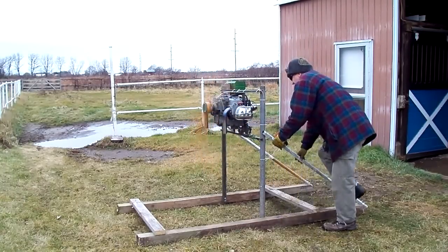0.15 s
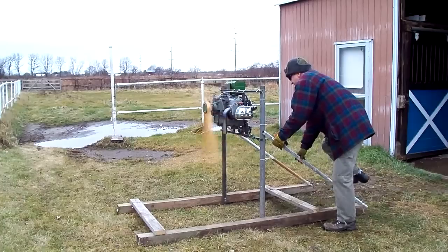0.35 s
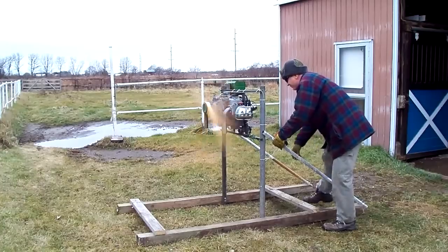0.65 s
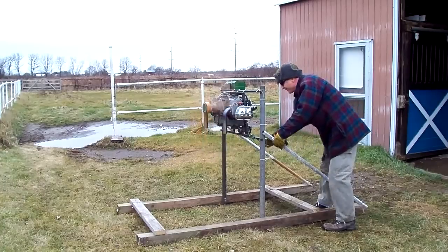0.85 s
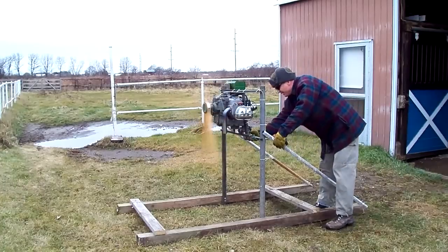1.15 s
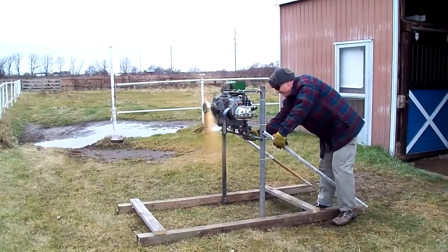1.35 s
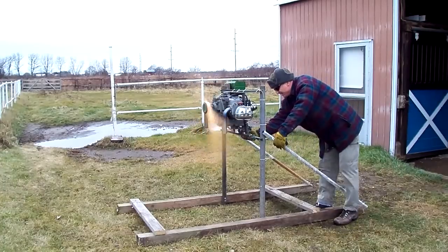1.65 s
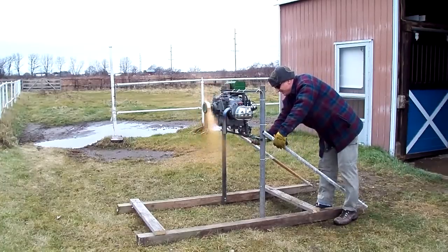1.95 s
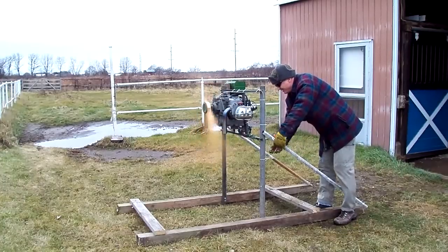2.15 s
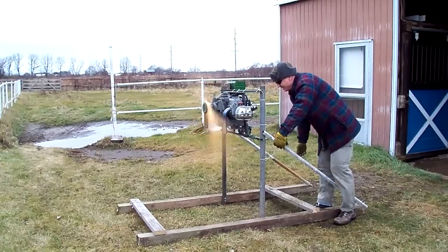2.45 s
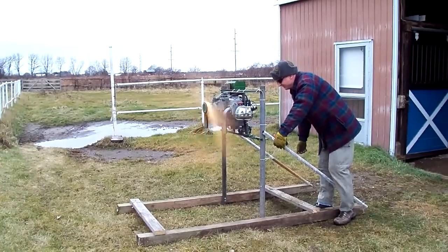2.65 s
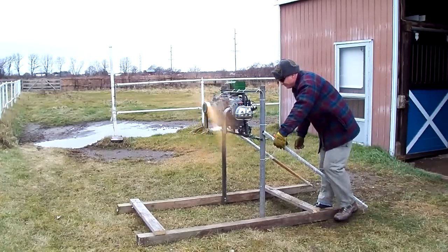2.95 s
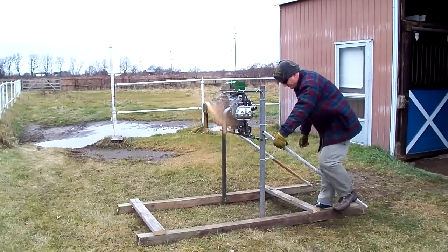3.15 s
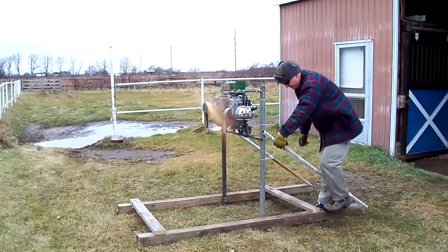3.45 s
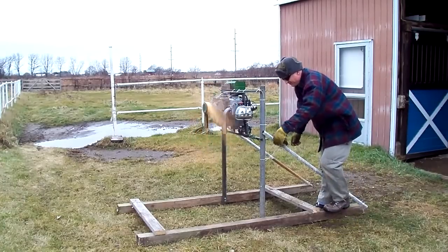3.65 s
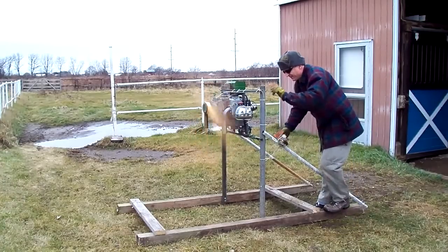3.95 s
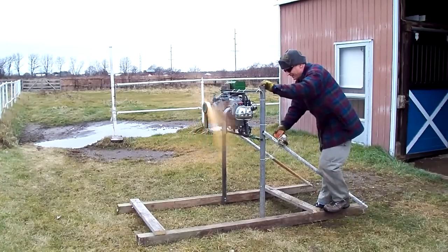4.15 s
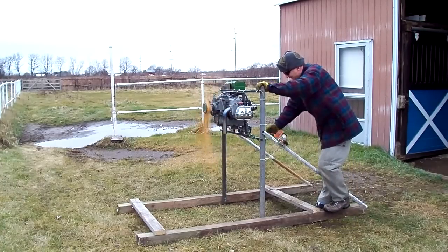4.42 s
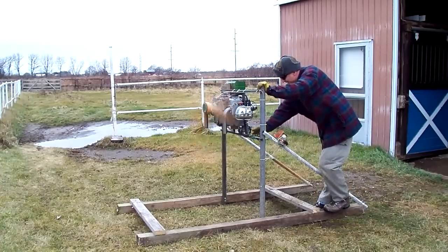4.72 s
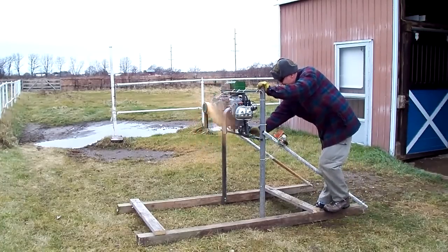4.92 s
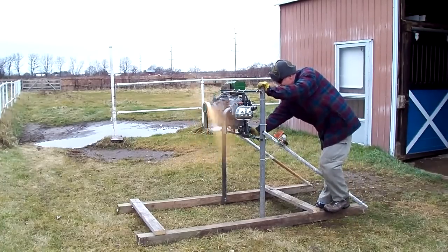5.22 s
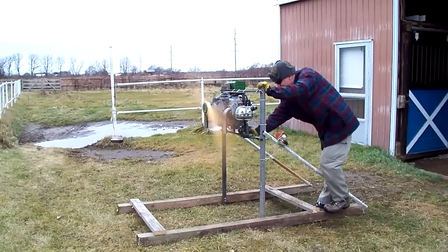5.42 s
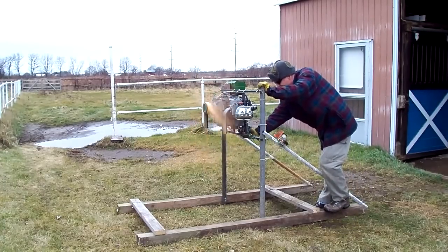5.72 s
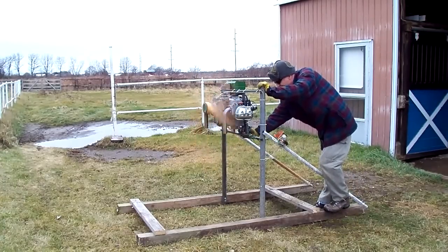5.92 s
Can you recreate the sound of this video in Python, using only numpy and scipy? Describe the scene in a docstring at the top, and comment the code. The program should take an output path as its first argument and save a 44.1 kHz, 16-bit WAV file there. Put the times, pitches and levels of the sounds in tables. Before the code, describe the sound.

Rapid, even exhaust putter from a two-cylinder engine turning a propeller in a yard, with rushing air and some wind buffeting.

```python
"""A small two-cylinder air-cooled engine idles on a stand in a yard and swings a wooden propeller. The
cylinders fire in turn through short pipes: each firing is a thump that rings in the pipe, with a spit of hot
gas and a tiny whistle. A barn wall echoes the firings, the stand rings and valves rattle. The propeller churns
the air and throbs, brief hums come and go, and wind buffets the microphone."""
import sys
import numpy as np
from scipy import signal
from scipy.fft import rfft, irfft, next_fast_len
from scipy.io import wavfile
from scipy.ndimage import map_coordinates

SR = 44100
rng = np.random.default_rng(int(sys.argv[2]) if len(sys.argv) > 2 else 0)


def wrap_up_sound(samples):
    """Save the sound to the file named by the first command line argument, as 16-bit audio."""
    columns = np.atleast_2d(samples).T
    # keep every value between -1 and 1, then stretch to whole-number steps
    tamed = np.clip(columns, -1, 1)
    steps = np.round(tamed * 32767).astype(np.int16)
    wavfile.write(sys.argv[1], SR, steps)


N = 268128

# How fast the engine turns: time_s, speed_rpm
ENGINE_SPEED = [(0, 1475.7), (0.55, 1449.1), (0.8, 1476.0), (1.0, 1450.1), (1.3, 1485.2), (1.6, 1483.0),
                (1.9, 1511.9), (2.8, 1477.1), (3.0, 1509.5), (3.15, 1479.0), (3.5, 1506.9), (4.1, 1500.3),
                (4.3, 1530.2), (4.45, 1512.4), (4.7, 1530.3), (5.5, 1499.9), (5.75, 1481.3), (6.08, 1498.5)]
# Slow changes in the strength of the firings: time_s, thump_change_db, spit_change_db
FIRING_STRENGTH = [(0, -0.5, 0.8), (.9, 0, 0.2), (1.4, -0.3, 0), (1.8, 0.5, -2), (2.5, -0.1, 0.6),
                   (3.05, .5, 1), (3.5, -.6, -1), (4.1, 0, 0), (4.7, 0.5, -0.5), (5.2, 0.8, 0.4),
                   (6.08, -1.4, 1)]
USUAL_SPIT_DB = -27.4


def amp(db):
    """Turn decibels into a number to multiply by."""
    return 10 ** (np.asarray(db) / 20)


def value_at(points, hz):
    """Read between rows of (frequency, value), giving each octave about equal room."""
    point_hz, values = np.transpose(points)
    return np.interp(np.log(hz + 1), np.log(point_hz + 1), values)


def filtered(sound, gain_at):
    """Multiply each frequency of a sound by gain_at(hz)."""
    size = next_fast_len(N + 8192)
    return irfft(rfft(sound, size) * gain_at(np.fft.rfftfreq(size, 1 / SR)), size)[:N]


def noise(colour):
    """Noise of typical size 1, shaped by rows of (frequency_hz, relative_db)."""
    shaped = filtered(rng.standard_normal(N), lambda hz: amp(value_at(colour, hz)))
    return shaped / np.std(shaped)


def wobble(per_s):
    """A smooth curve through per_s random values a second."""
    return map_coordinates(rng.standard_normal(int(N * per_s / SR) + 4), [np.arange(N) * per_s / SR])


def swell(t, swell_s):
    """Rise softly to 1 at twice swell_s, then fade."""
    age = t / swell_s
    return (age / 2) ** 2 * np.exp(2 - age)


def blip(t, swell_s, hz):
    """A short tone that swells and fades."""
    return swell(t, swell_s) * np.sin(2 * np.pi * hz * t)


def add(track, start_s, sound):
    """Mix a sound into a track at start_s."""
    part = track[max(round(start_s * SR), 0):][:len(sound)]
    part += sound[:len(part)]


def firings():
    """Each cylinder fires once in two turns, and no two charges of fuel are quite alike."""
    # Firings that whistle harder than most: time_s, spit_db, whistle_hz, whistle_db
    hard_firings = [(.221, -24.5, 7020, -26), (.386, -24, 4500, -31), (1.126, -24.5, 5000, -34),
                    (1.570, -26.5, 4900, -29), (1.932, -24, 6300, -31), (2.290, -25.5, 6250, -25),
                    (2.653, -26, 6240, -24), (3.257, -24.6, 5560, -35), (3.337, -27, 3420, -25),
                    (3.576, -26.5, 4600, -25), (3.698, -29, 5000, -26.5), (4.256, -28.5, 5100, -24),
                    (4.572, -25.2, 3050, -27), (4.651, -24.5, 5000, -34), (4.729, -25.5, 6870, -21),
                    (5.123, -27.5, 6370, -20), (5.682, -25, 6350, -23.5), (5.925, -24.9, 6890, -27)]
    first_peak_s, second_cylinder_lag = .01606, .5177  # the lag is a share of the two-turn cycle
    t = np.arange(N) / SR
    cycles = np.cumsum(np.interp(t, *np.transpose(ENGINE_SPEED))) / (120 * SR)
    cycles -= np.interp(first_peak_s, t, cycles)
    count = np.arange(2 * int(cycles[-1]) + 1)
    peak_s = np.interp(count // 2 + count % 2 * second_cylinder_lag, cycles, t)  # pressure peaks
    luck = rng.standard_normal((len(count), 4)).T
    spit_db = USUAL_SPIT_DB + 0.37 * luck[0] + np.interp(peak_s, *np.transpose(FIRING_STRENGTH)[::2])
    bright_db = 2.63 + 2.7 * luck[1]
    whistle_hz, whistle_db = 4400 * np.exp(0.449 * luck[2]), -37 + 3 * luck[3]
    fired = np.transpose([peak_s, spit_db, bright_db, whistle_hz, whistle_db])
    for time_s, *settings in hard_firings:
        fired[np.argmin(abs(peak_s - time_s)), [1, 3, 4]] = settings
    return fired


def pipe_thumps(fired):
    """Each firing makes its pipe ring with several low tones, each starting with suction."""
    # Each pipe's tones, lowest first: pitch_hz, level_db, swell_s, start_after_peak_s
    pipe_tones = [
        [(64, -28.9, 0.0082, -0.011), (121, -18.7, 0.0043, -0.0064), (194, -31.9, 0.0068, -0.0028),
         (316, -34.5, 0.0038, 0.0019), (344, -27.9, 0.0017, -0.0053), (530, -34.0, 0.001, -0.0024)],
        [(72, -34.2, 0.0075, -0.0087), (118, -20.9, 0.0042, -0.0068), (202, -29.4, 0.0041, -0.0021),
         (300, -27.1, 0.0018, -0.0018), (338, -29.3, 0.003, -0.0057), (429, -43.7, 0.0059, -0.0034)],
    ]
    # The throaty upper tones grow and shrink: time_s, change_db
    throatiness = [(0, -1.5), (.9, 0), (1.8, 0), (2.7, 0.9), (3.6, -0.5), (4.3, 0.5), (5, 1), (5.6, 1.5),
                   (6.08, 2)]
    # The first pipe also barks and knocks: pitch_hz, level_db, swell_s, start_after_peak_s, db_per_throat_db
    barks = [(353, -39, 0.0027, 0.01093, 3), (229, -37.5, 0.0029, 0.02278, 0),
             (1000, -43, .0013, -.005, 2.2)]
    out, t = np.zeros(N), np.arange(SR // 10) / SR
    chance = rng.standard_normal((len(fired), 7))
    for k, (peak_s, spit_db, *_) in enumerate(fired):
        cylinder, luck = k % 2, chance[k]
        throat_db = np.interp(peak_s, *np.transpose(throatiness))
        push_db = np.interp(peak_s, *np.transpose(FIRING_STRENGTH)[:2]) + 0.45 * luck[0]
        push_db += 0.084 * (spit_db - USUAL_SPIT_DB)  # a harder spit thumps a little harder
        for tone, (hz, db, swell_s, offset_s) in enumerate(pipe_tones[cylinder]):
            upper_db = throat_db + 1.4 * luck[1 + tone] if tone > 2 else 0
            add(out, peak_s + offset_s, -amp(db + push_db + upper_db) * blip(t, swell_s, hz))
        if cylinder == 0:
            for hz, db, swell_s, offset_s, follows in barks:
                gain = amp(db + follows * throat_db + 1.5 * luck[1])
                add(out, peak_s + offset_s, gain * blip(t, swell_s, hz))
    return out


def gas_spits(fired):
    """An opening valve lets out a ragged jet of gas; its bounce off the ground makes it sound hollow."""
    # Each cylinder's spit: before_peak_s, rise_s, fall_s, tail_db, tail_fade_60db_s, intake_db
    spit_shapes = [(0.0037, 0.0014, 0.0032, -2, 0.054, -13), (0.0026, 0.0019, 0.0023, -3, 0.062, -32)]
    # The dull and the bright part of the hiss: frequency_hz, relative_db
    dull_hiss = [(250, -57), (500, 3), (1000, 1.5), (1400, -1), (2500, 1.5), (4500, 2.5), (5500, 2),
                 (7000, -7.5), (9000, -43)]
    bright_hiss = [(3500, -60), (5000, -5), (6500, 4.5), (8000, 4), (10000, 4.5), (13000, 7.5),
                   (16000, -2.5)]
    # Each cylinder's jet loses bass below this: frequency_hz
    thin_below_hz = [300, 1460]
    # Each jet's ground echo: ripple_spacing_hz (1 / delay), level_db, fades_above_hz
    ground_bounces = [(563, -2, 6500), (632, -1.5, 11000)]
    out, t = np.zeros(N), np.arange(-SR // 100, SR // 12) / SR
    chance = rng.standard_normal((len(fired), 3))
    for cylinder, (lead_s, rise_s, fall_s, tail_db, fade_s, intake_db) in enumerate(spit_shapes):
        jets, tails = np.zeros((2, N)), np.zeros((2, N))  # loudness curves: dull, bright
        for (peak_s, db, bright_db, *_), luck in zip(fired[cylinder::2], chance[cylinder::2]):
            width_s = np.where(t < 0, rise_s, fall_s * np.exp(0.35 * luck[1]))
            jet = np.exp(-.5 * (t / width_s) ** 2)
            tail = np.where(t < 0, jet, amp(-60 * t / fade_s)) * amp(tail_db + luck[2])
            tail += amp(intake_db) * np.exp(-.5 * ((t - .031) / 0.0024) ** 2)  # air is drawn in after
            start_s = peak_s - lead_s + t[0]
            for band, sign in enumerate((-1, 1)):
                gain = amp(db - 3 + sign * bright_db / 2)
                add(jets[band], start_s + 0.00043 * luck[0], gain * jet)
                add(tails[band], start_s, gain * tail)
        ragged = amp(3.5 * wobble(1500))  # swirls tear the jet into crackles
        direct = ragged * (jets[0] * noise(dull_hiss) + jets[1] * noise(bright_hiss))
        direct = filtered(direct, lambda hz: hz ** 2 / (hz ** 2 + thin_below_hz[cylinder] ** 2))
        ripple_hz, bounce_db, fade_hz = ground_bounces[cylinder]
        echo = filtered(direct, lambda hz: np.exp(-2j * np.pi * hz / ripple_hz) / (1 + (hz / fade_hz) ** 4))
        out += direct + amp(bounce_db) * echo
        out += tails[0] * noise(dull_hiss) + tails[1] * noise(bright_hiss)  # gas hisses as it drains
    return out


def jet_whistles(fired):
    """The jet sounds a short high note of its own just before each pressure peak."""
    out, t = np.zeros(N), np.arange(SR // 50) / SR
    for peak_s, _, _, hz, db in fired:
        add(out, peak_s - .006, amp(db) * blip(t, swell_s=.0012, hz=hz))
    return out


def barn_echoes(thumps, treble):
    """Walls send each thump back as single echoes; the treble scatters round the yard."""
    # Echoes off the walls: delay_s, level_db
    walls = [(.0124, -6.5), (.0199, -20), (.0253, -14.5)]
    # How long sound lingers in the yard: frequency_hz, fade_60db_s
    yard_fade = [(100, 0.45), (1000, .25), (5000, 0.61), (14000, 0.055)]
    echoes = np.zeros(N)
    for delay_s, db in walls:
        add(echoes, delay_s, amp(db) * thumps)
    hz, t, spectrum = signal.stft(rng.standard_normal(SR // 3), SR, nperseg=256)
    fade = amp(-60 * t / value_at(yard_fade, hz)[:, None])
    tail = signal.istft(spectrum * fade, SR, nperseg=256)[1]
    return echoes + amp(-20.5) * signal.fftconvolve(treble, tail / np.linalg.norm(tail))[:N]


def stand_ring(fired):
    """Every firing shakes the tube frame, whose tones ring on at slowly changing strengths."""
    # The frame's tones: pitch_hz, level_db, fade_60db_s
    frame_tones = [(247.7, -59, 0.26), (302, -56, 0.18), (371, -45, 0.15), (716, -49.5, 0.19),
                   (1068, -54, 0.05)]
    out, t = np.zeros(N), np.arange(SR // 2) / SR
    kicks = np.zeros(N)
    kicks[np.round(fired[:, 0] * SR).astype(int)] = 1
    soft_start = 1 - np.exp(-t / 0.0033)
    for hz, db, fade_s in frame_tones:
        ring = amp(db - 60 * t / fade_s) * soft_start * np.sin(2 * np.pi * hz * t)
        out += signal.fftconvolve(kicks * amp(4.0 * wobble(2.79)), ring)[:N]
    return out


def valve_rattle():
    """The parts that work the valves tick faintly and unevenly, each tick a short buzz."""
    # The tone colour of a tick: frequency_hz, relative_db
    tick_colour = [(800, -26), (1700, 6), (4000, -4.5), (6200, 3), (8000, -25), (12000, 3), (15000, -9.5)]
    ticks_per_s, fade_60db_s = 300, 0.012
    ticks = (rng.random(N) < ticks_per_s / SR) * amp(1.7 * rng.standard_normal(N))
    fade = amp(-60 * np.arange(SR // 100) / SR / fade_60db_s)
    buzz = signal.fftconvolve(ticks, fade)[:N] * noise(tick_colour)
    return amp(-47) * buzz / np.std(buzz)


def propeller_throb():
    """The slightly uneven propeller pushes the air once a turn; brief hums at a multiple of the turning rate
    come and go."""
    # Hums locked to the turning rate: start_s, length_s, waves_per_turn, level_db
    hums = [(0.302, 0.88, 12, -41), (2.75, 0.57, 12, -42), (5.55, 0.505, 10, -39.5)]
    t, fade_s = np.arange(N) / SR, 0.11
    turns = np.cumsum(np.interp(t, *np.transpose(ENGINE_SPEED))) / (60 * SR)
    out = -amp(-47 + wobble(3)) * np.sin(2 * np.pi * turns)
    for start_s, length_s, waves_per_turn, db in hums:
        fade = np.clip(np.minimum(t - start_s, start_s + length_s - t) / fade_s, 0, 1)
        out += amp(db + 1.8 * wobble(7.4)) * fade * np.sin(2 * np.pi * waves_per_turn * turns)
    return out


def wind():
    """Wind rumbles on the microphone in lumpy gusts and slaps it twice."""
    # The strength of the gusts: time_s, level_db
    gusts = [(0, -33), (.15, -41), (.32, -37), (.76, -47), (.9, -37), (1.0, -46), (1.09, -38), (1.2, -55),
             (1.55, -33), (1.75, -49), (2.17, -37), (2.42, -35), (2.9, -46), (3.15, -33), (3.35, -37),
             (3.9, -49), (4.3, -58), (6.08, -52)]
    # The tone colour of the rumble: frequency_hz, relative_db
    rumble_colour = [(1, -40), (7, 2), (15, 7), (28, -2), (45, -6), (90, -7), (200, -50)]
    # Slaps of wind: start_s, level_db, pitch_hz
    slaps = [(0.06, -20, 27.8), (3.135, -15, 24)]
    gust_db = np.interp(np.arange(N) / SR, *np.transpose(gusts)) + 3 * wobble(7.1) + 1.8 * wobble(36)
    out = amp(gust_db) * noise(rumble_colour)
    t = np.arange(SR // 8) / SR
    for start_s, db, hz in slaps:
        add(out, start_s, -amp(db) * swell(t, 0.0036) * np.cos(2 * np.pi * hz * t))
    return out


def propeller_churn():
    """The blades churn the air into a steady rush with a slight flutter."""
    # The tone colour of the rush: frequency_hz, relative_db
    rush_colour = [(10, -45), (40, -18), (100, -7.5), (200, 4), (222, 2), (245, -1.5), (275, -2.5),
                   (310, 1), (400, -2), (800, -3), (1500, -9.5), (4000, -15.5), (8000, -22.5),
                   (15000, -17.5)]
    return amp(-40 + 1.44 * wobble(40)) * noise(rush_colour)


def scene():
    """Engine, barn, stand, propeller and wind add up at one microphone."""
    fired = firings()
    thumps = pipe_thumps(fired)
    treble = gas_spits(fired) + jet_whistles(fired)
    engine = thumps + treble + barn_echoes(thumps, treble) + stand_ring(fired) + valve_rattle()
    return (engine + propeller_throb() + wind() + propeller_churn())[None]


def record(dry):
    """The microphone ignores steady pressure, dulls near 14 kHz and passes nothing above top_hz."""
    # The microphone's treble: frequency_hz, gain_db
    mic_treble = [(13800, 0), (14050, -15), (14900, -28)]
    bass_cut_hz, top_hz = 5, 15260

    def mic_gain(hz):
        bass_cut = 1j * hz / (bass_cut_hz + 1j * hz)
        return bass_cut * amp(value_at(mic_treble, hz)) * (hz < top_hz)

    return filtered(dry[0], mic_gain)[None]


dry = scene()
out = record(dry)
wrap_up_sound(out)
```